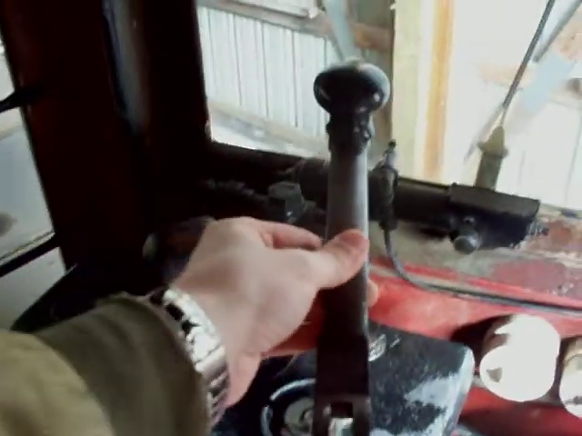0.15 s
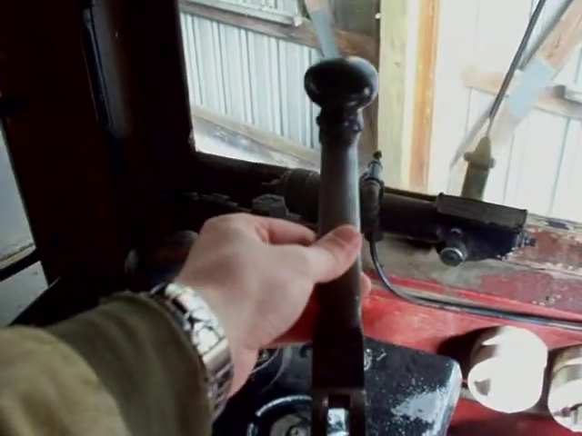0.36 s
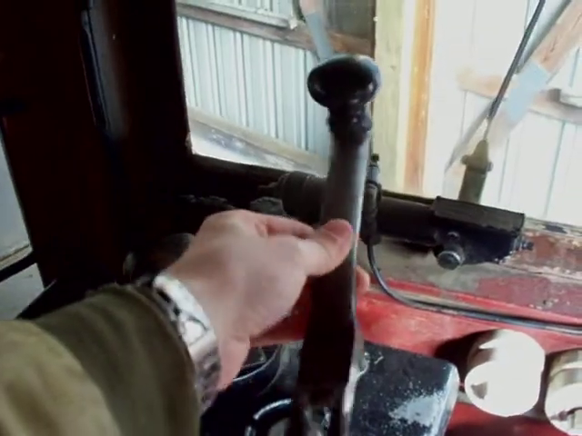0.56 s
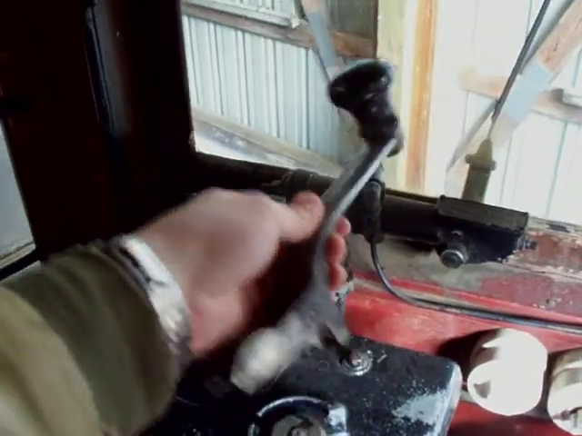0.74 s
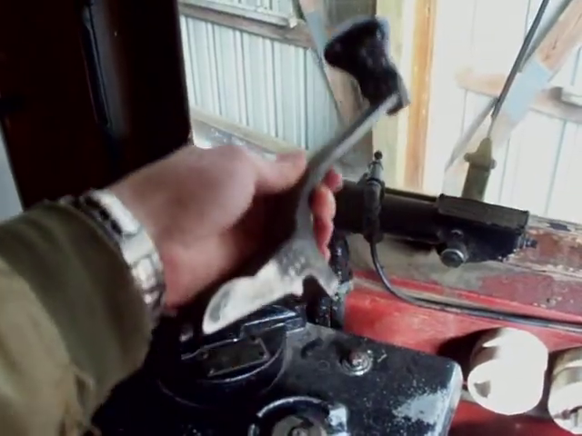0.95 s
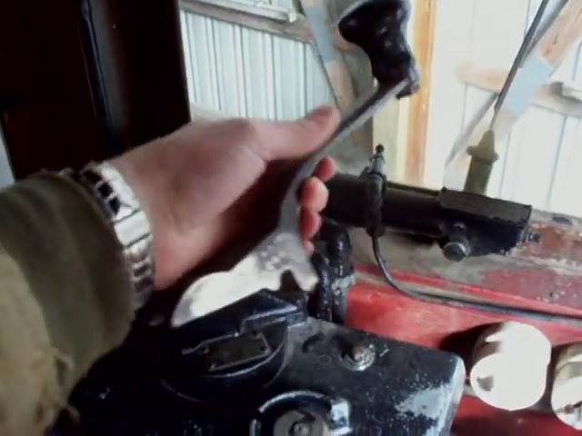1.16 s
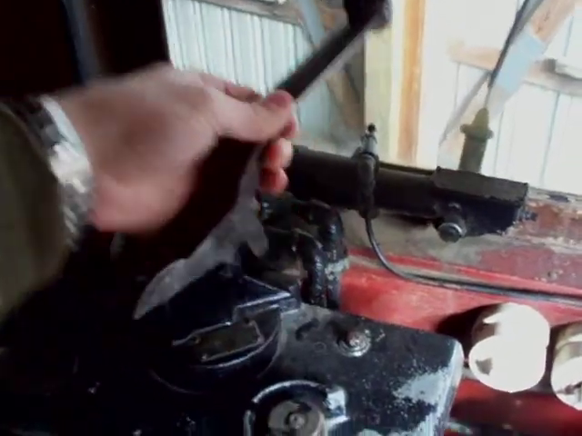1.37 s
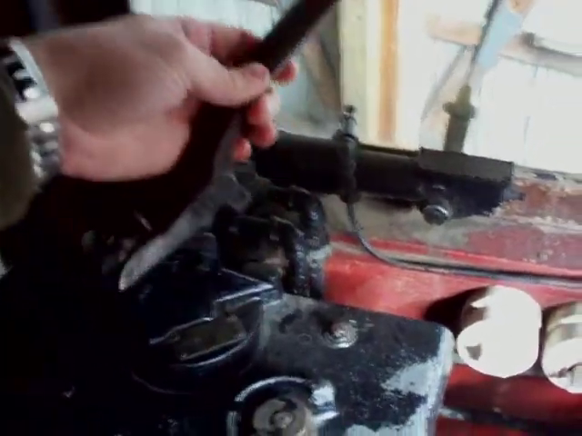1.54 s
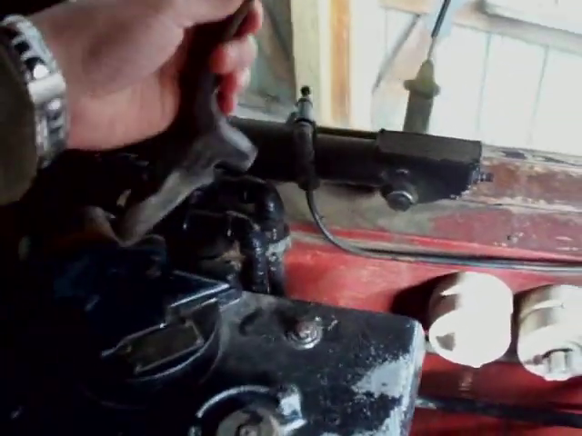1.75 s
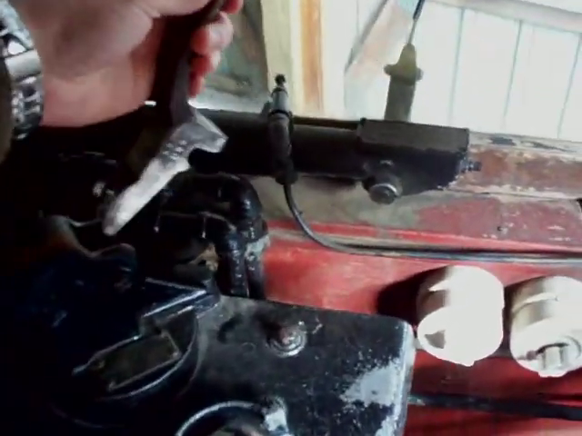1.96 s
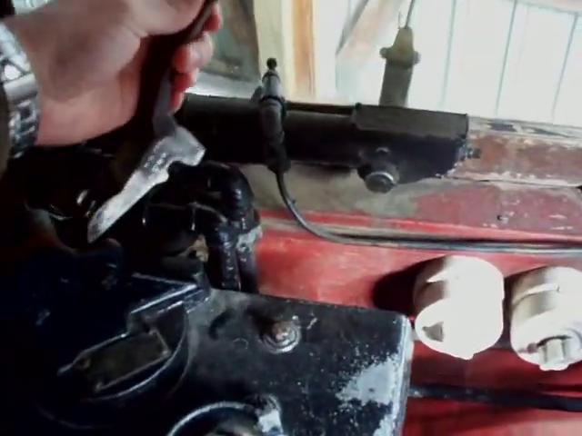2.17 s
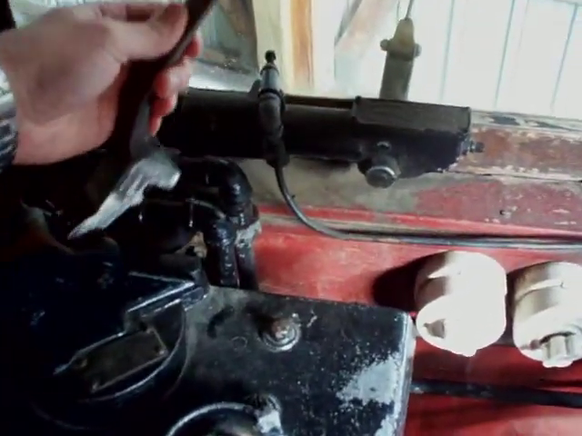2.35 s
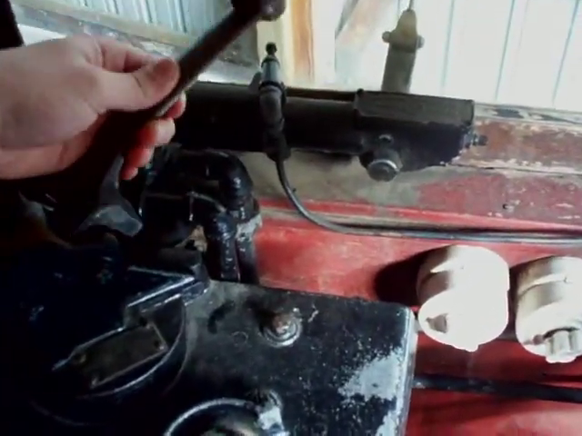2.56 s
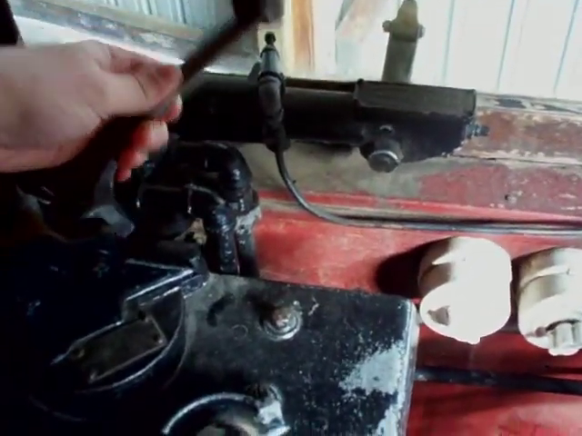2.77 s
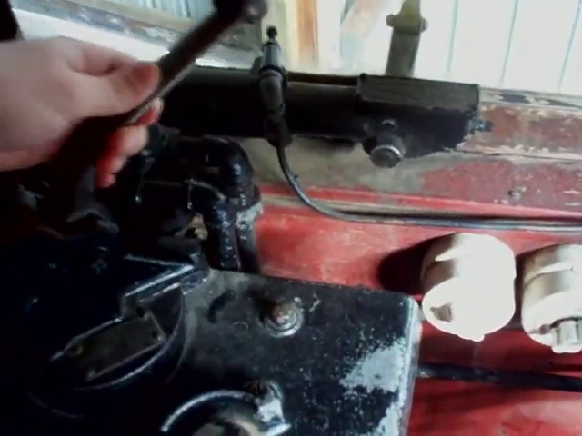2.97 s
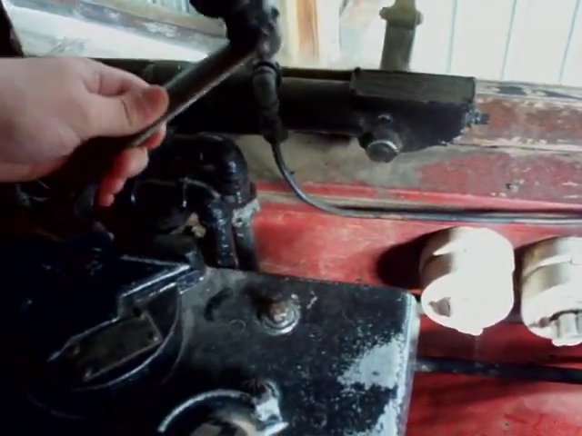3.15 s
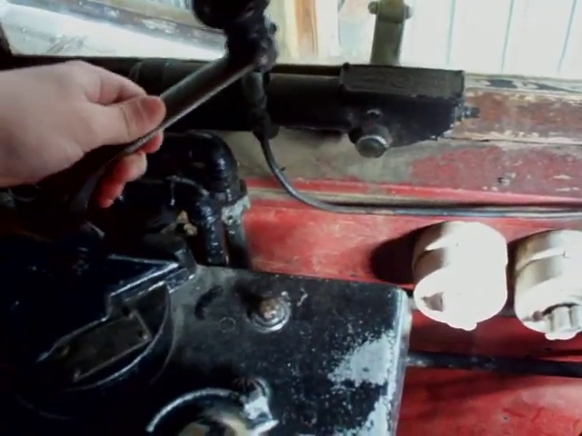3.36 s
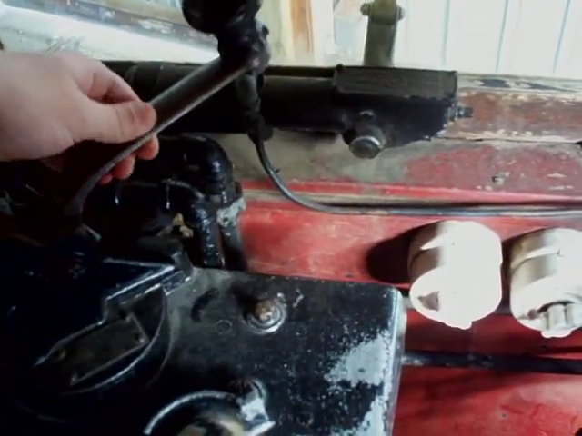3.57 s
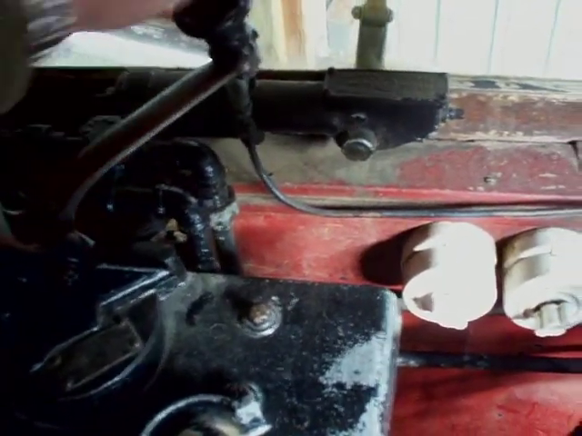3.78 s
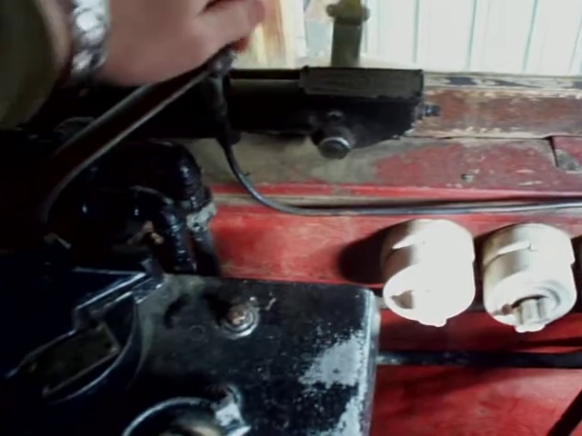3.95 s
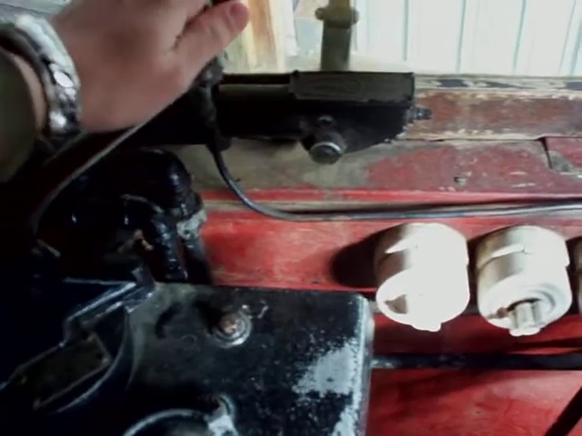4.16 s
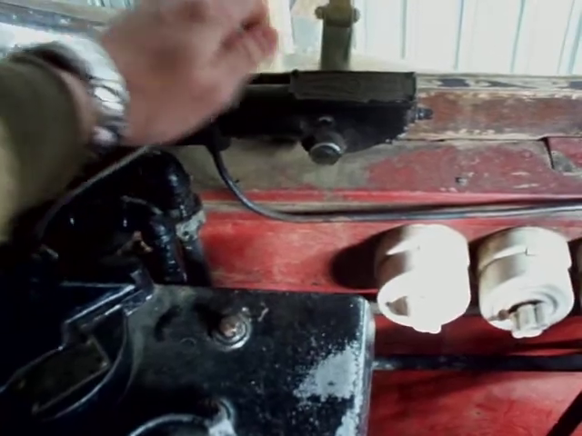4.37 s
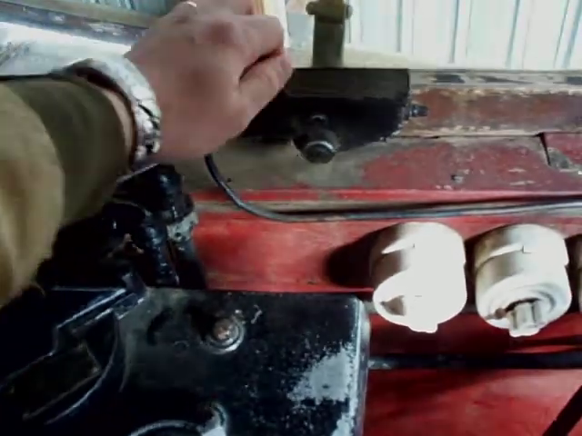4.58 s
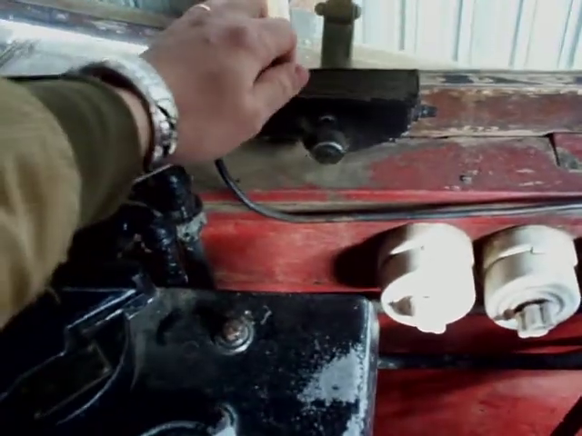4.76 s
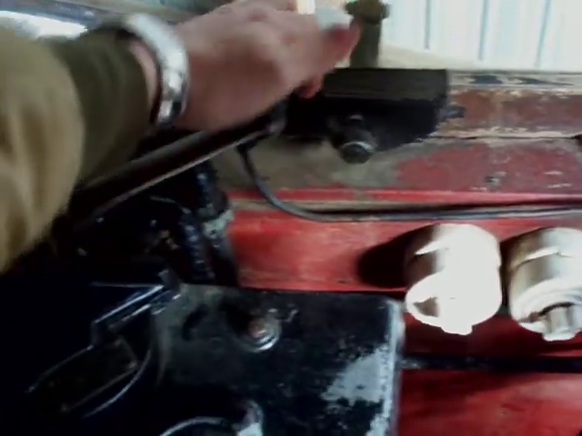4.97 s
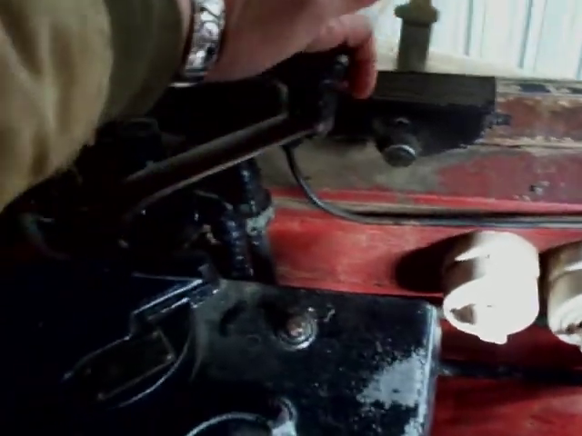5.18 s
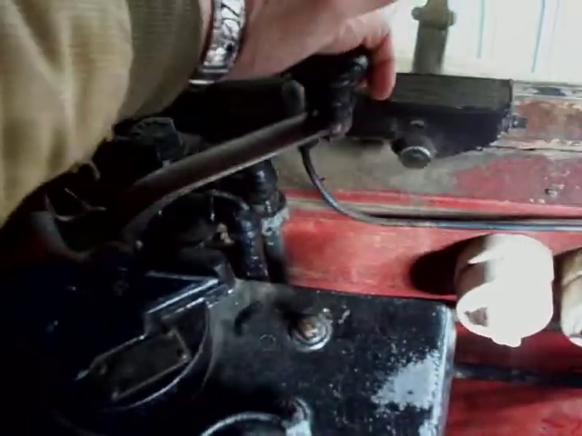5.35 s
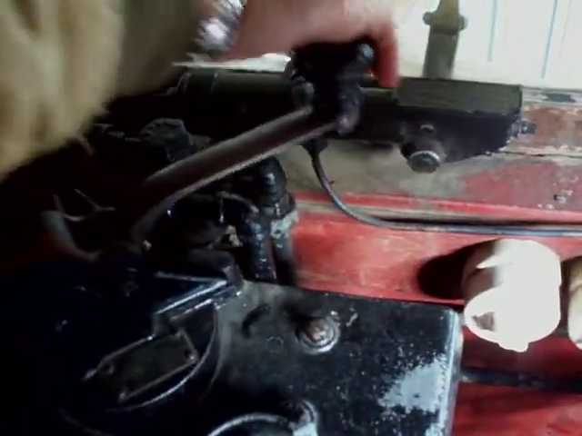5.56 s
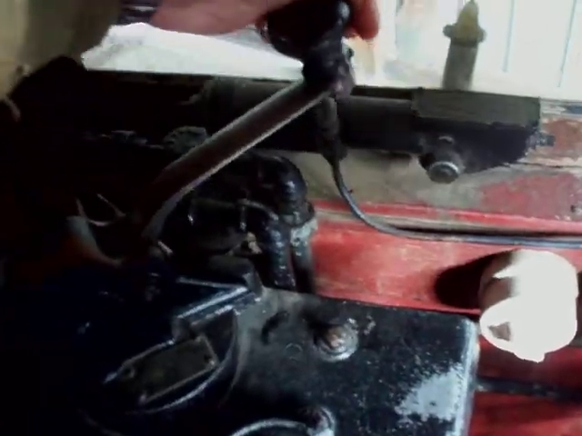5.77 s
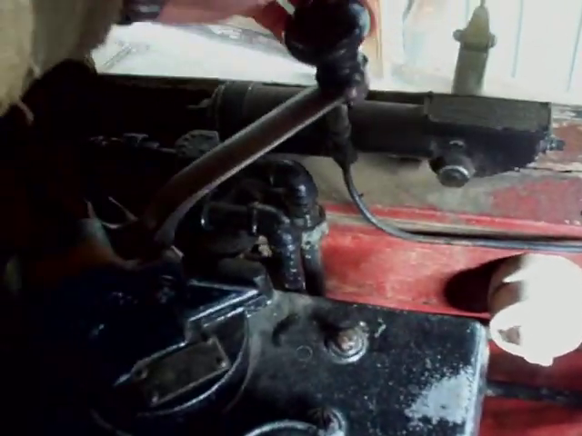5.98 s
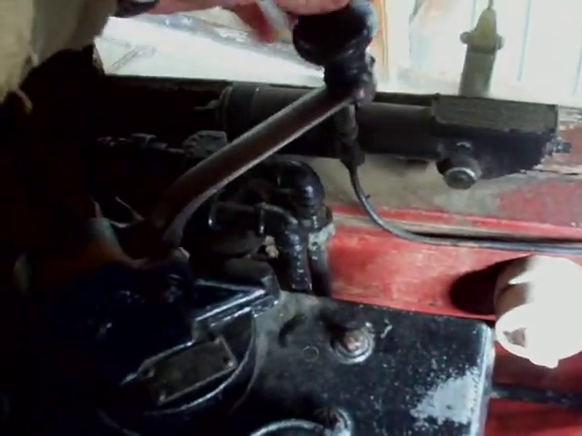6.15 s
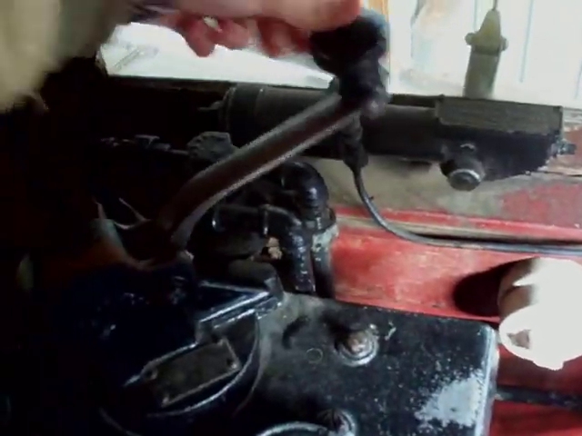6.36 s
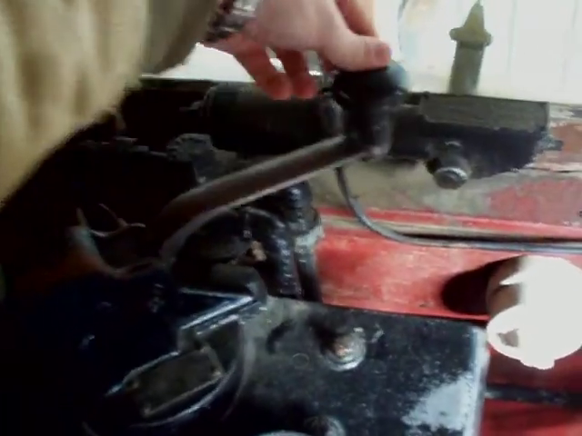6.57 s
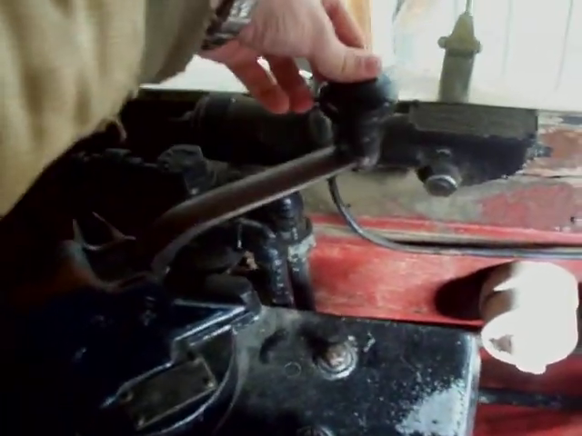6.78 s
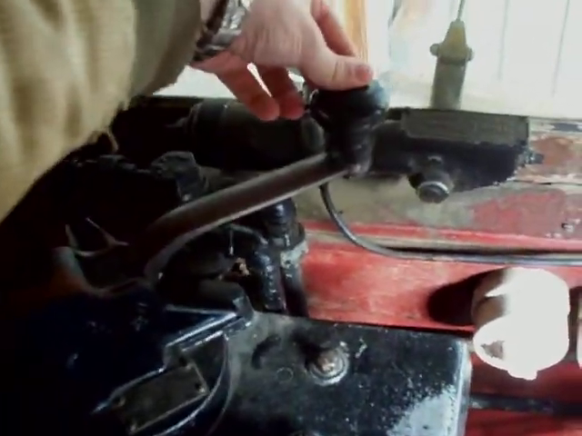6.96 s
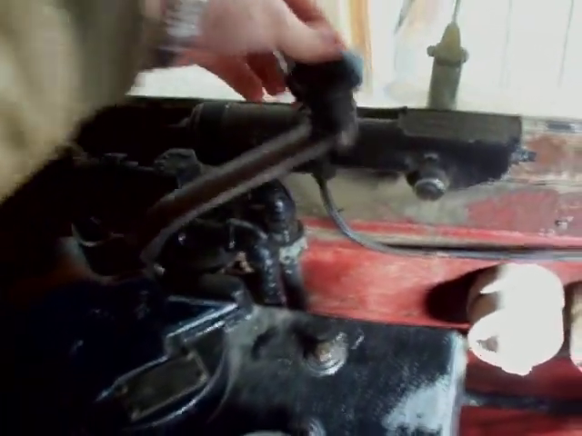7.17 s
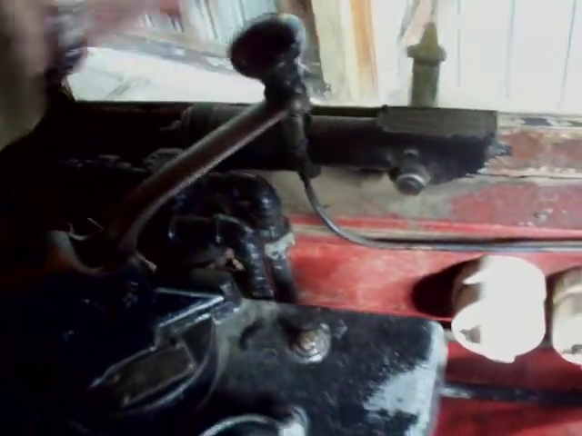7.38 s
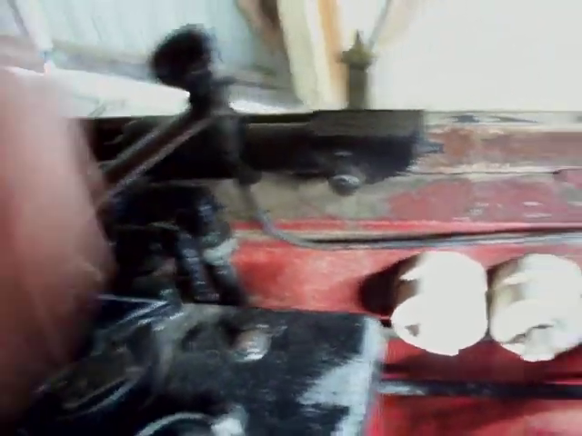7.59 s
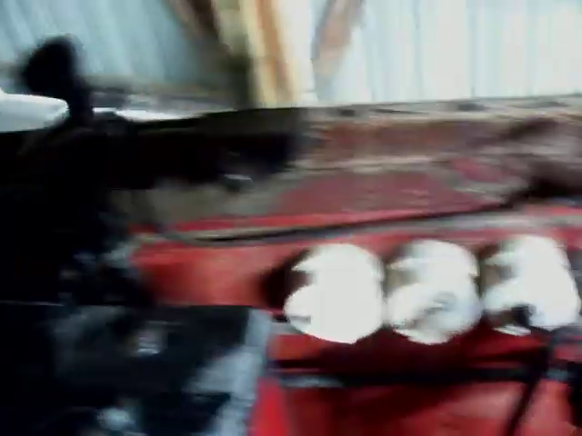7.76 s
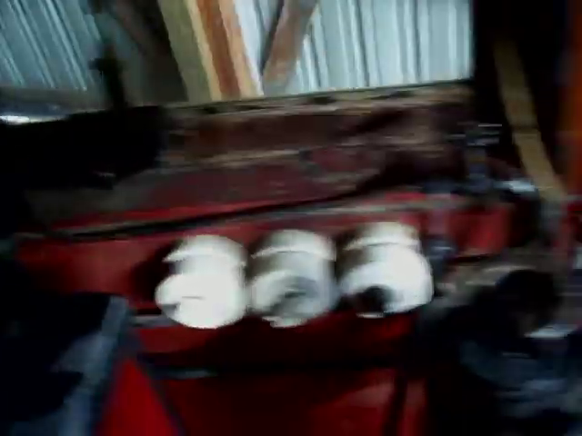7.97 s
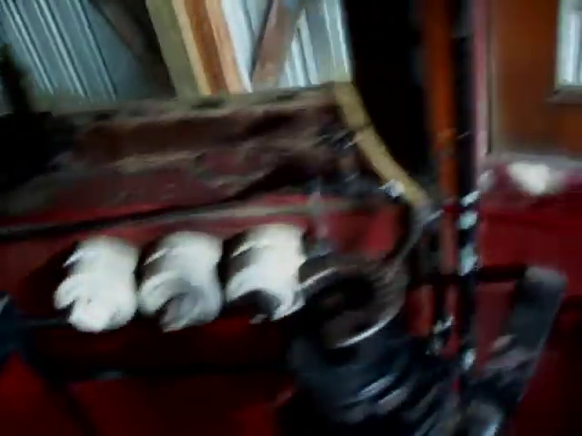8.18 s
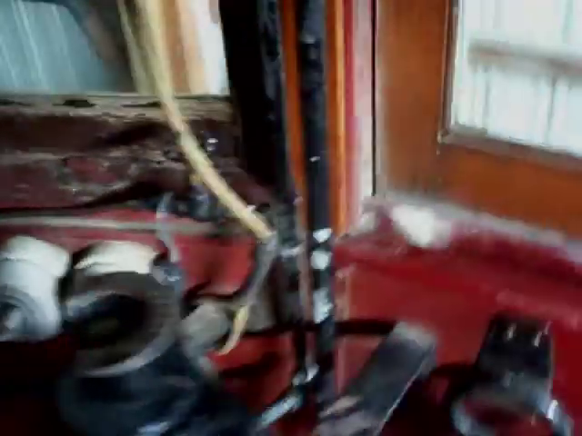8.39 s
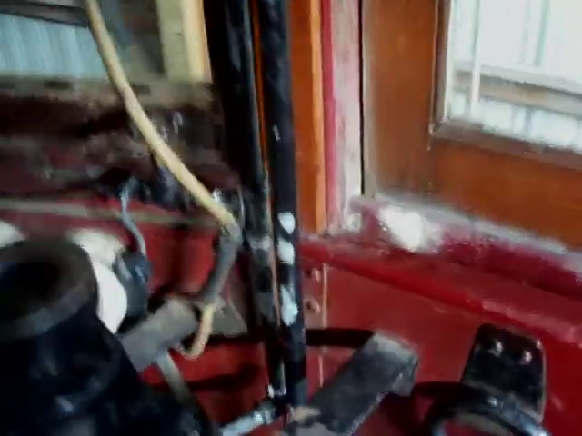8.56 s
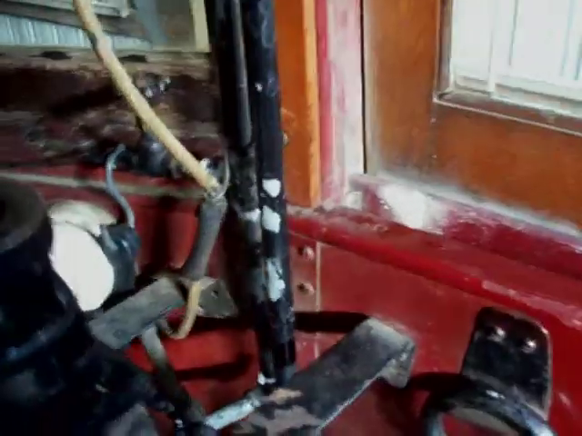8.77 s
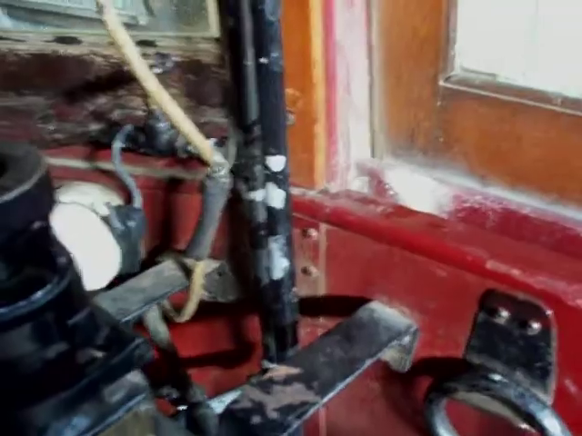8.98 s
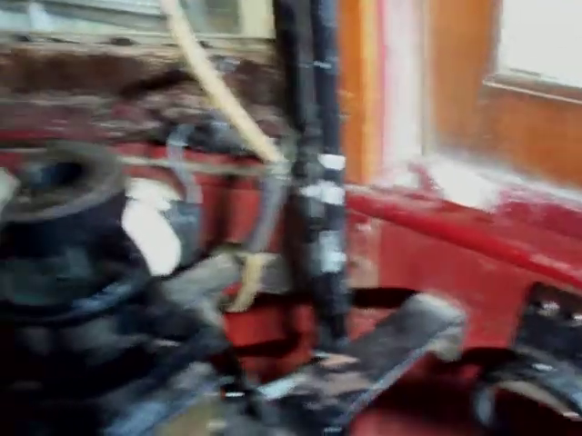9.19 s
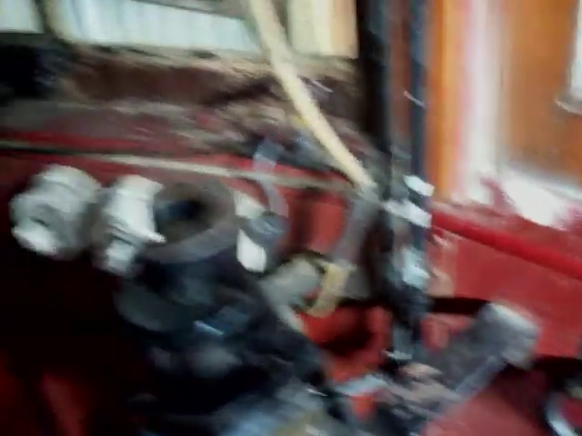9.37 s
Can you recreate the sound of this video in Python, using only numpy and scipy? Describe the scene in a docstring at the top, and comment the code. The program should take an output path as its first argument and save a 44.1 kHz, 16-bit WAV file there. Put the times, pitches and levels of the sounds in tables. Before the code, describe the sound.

A close, slightly dull microphone in a small wooden cab picks up steady soft hiss and low rumble. Only a faint bump and tiny ticks occur until about 2.1 s, when a steel handle clinks on a shaft, slides with a brief bright scrape and chatters loudly at 2.4 s. Its ring is choked as it seats; another slide leads to a hard knock at 2.75, then smaller rattling knocks until 3.3. A soft hand rub and dull bumps come near 3.9. At 4.4 a short grind and rapid contact clicks end in a heavy boomy clunk. A pawl snaps at 5.55 before a backward clunk at 5.65; forward again at 6.4, back at 7.1-7.2. Panels throb and the cab echoes briefly. Light ticks follow around 7.5-7.9. At 8.5 feet scuff and bump, then a loose iron fitting clanks strongly at 8.75, with weaker rebounds, fading into hiss and rumble.

```python
"""Steel handle fitted onto a streetcar's drum controller, cranked forward, back, forward, back through notches.
First it slides on the shaft and rings free (cracks of noise plus decaying modes), then, gripped, knocks in its play.
Each turn grinds (rubbed noise); contact fingers catch forward, a pawl snaps back; the drum drops in its notch and
panels boom. Last, feet bump and scuff and a loose iron fitting clanks. The wooden cab echoes by convolution;
microphone hiss and low rumble (shaped noise) run throughout; the output saturates softly and is dull."""
import sys
import numpy as np
from scipy import signal
from scipy.fft import rfft, irfft, next_fast_len
from scipy.io import wavfile

SR = 44100
rng = np.random.default_rng(int(sys.argv[2]) if len(sys.argv) > 2 else 0)


def transcribe(signal):
    """Save signal, clipped to [-1, 1], as a 16-bit WAV file at the path in sys.argv[1]."""
    frames = np.atleast_2d(signal).T
    limited = np.clip(frames, -1, 1)
    pcm = np.round(limited * 32767).astype(np.int16)
    wavfile.write(sys.argv[1], SR, pcm)


N = 415863

# Levels of blows and ticks are relative; each source adds its own offset.
# Microphone hiss: f/Hz, relative density/dB per Hz
HISS_SPECTRUM = [(12, -30), (20, 5.5), (22, -1.5), (150, -21.5), (381, -20), (432, -22), (542, -23),
                 (852, -26), (1180, -29.5), (1310, -29), (5360, -34), (6890, -34), (8220, -50.5),
                 (10700, -86.5), (18100, -120)]
# Hiss over time: t/s, level/dB
HISS_LEVEL = [(0, -54.5), (.6, -58.5), (1.1, -57.5), (1.5, -52.5), (2.1, -57), (6.9, -57), (7.5, -50),
              (8.6, -51), (9.4, -48.5)]
# Car-body rumble at rest, and the shake added by a heavy blow
RUMBLE_DB = -58.5
SHAKE_DB = {"forward": -40, "back": -41.5, "down": -39, "clank": -46}
SHAKE_RISE_S, SHAKE_T60_S = .08, 2.3

# Cab echo, strength: f/Hz, level/dB
CAB_DB = [(40, 4.5), (120, 1.5), (250, -7.5), (600, -8), (1500, -11), (4000, -12), (8000, -16)]
# Cab echo, decay: f/Hz, t60/s
CAB_T60 = [(40, 1.8), (120, 1.5), (250, 1.1), (600, 0.55), (1500, 0.47), (4000, 0.37), (8000, 0.53)]
# Panels of case and floor, by direction of blow: f/Hz, level/dB, rise/s, t60/s
PANEL_BOOMS = {"forward": [(98, -29, 0.029, 0.4), (123.5, -28, .067, .44), (219, -20, 0.012, 0.14),
               (637, -36.5, .005, 0.38)], "back": [(93, -35, 0.082, 0.58), (230, -30, 0.012, 0.21),
               (286, -23, 0.0045, 0.22), (640, -25.5, 0.003, 0.14), (830, -35.5, .005, 0.3)],
               "down": [(76, -44, .09, .53), (304, -22.5, 0.0085, 0.22)]}
# Handle driven down onto the shaft: t/s, boom level/dB
SEATINGS = [(2.422, 1.5), (2.752, -4)]

# Steel sliding on steel as the handle seeks the shaft: start/s, length/s, level at end/dB
SLIDES = [(2.23, .17, -54), (2.52, .15, -55.5)]
# Dull rubbing, hand on knob, later a foot: start/s, length/s, level at end/dB
SCUFFS = [(3.87, 0.16, -56), (8.515, 0.35, -41.5)]
GRIND_DB, PRESS_DB_PER_S, RUB_FADE_S = -43.5, 30.5, .025

# Light ticks, mostly of hand and watch strap, one a sharp broad click at 4.56 s: t/s, level/dB, centre f/Hz
TICKS = [(1.936, -42, 3300), (1.949, -47, 5500), (2.207, -27, 4097), (4.564, -32.5, 2400),
         (5.909, -45.5, 2170), (6.037, -42.5, 2000), (7.04, -38.5, 3740), (7.062, -40, 3770),
         (7.48, -30, 6100), (7.485, -23.5, 6230), (7.497, -29.5, 6100), (7.708, -42, 3700),
         (7.774, -25, 4200), (7.926, -39, 2050), (8.597, -39, 3400)]
# Fainter ticks at random times
FAINT_PER_S, FAINT_DB, FAINT_HZ = .8, -49, (2000, 6000)

# Dull bumps of drum, hand and feet: t/s, level/dB, extra bass/dB
BUMPS = [(1.305, -25, -18), (2.325, -20.5, 6), (2.624, -12, -4), (3.942, -29.5, 9), (4.053, -27.5, -11.5),
         (5.359, -21, -6.5), (5.475, -20.5, -1), (6.179, -19.5, -11), (7.05, -19.5, -10), (8.517, -24, 5.5),
         (8.6, -17, -6), (8.675, -19, 3.5)]
# Loose iron fitting: t/s, level/dB, extra bass/dB, extra treble/dB, extra ring/dB
CLANKS = [(8.764, -2.7, -4.5, -0.5, 2.5), (8.842, -15.5, -9, -10, 13.5), (8.854, -12, 5.5, -7, 9)]
# Free handle on shaft: t/s, level/dB, extra bass/dB, extra treble/dB, extra ring/dB
CLINKS = [(2.127, 1.5, -4, -4.5, -3), (2.207, -11.5, 4.5, -3.5, -2), (2.409, 6.5, -8, 1, -8),
          (2.413, 8, -5.5, -2.5, 6.5), (2.419, 5, 3.5, -2, -9), (2.448, 3.5, -2, 2.5, 0.5),
          (2.473, 4, -6, 1.5, .5), (2.486, 3, 7.5, -3, -15)]
# Seated handle in its play: t/s, level/dB, extra bass/dB, extra treble/dB, extra ring/dB
KNOCKS = [(2.671, -5.5, -1, -8, 2.5), (2.7465, 11, 1, 3, .5), (2.79, 6.5, -6.5, -9, 0),
          (2.803, 5, 0, -3, -2.5), (2.943, -5.5, -7.5, -16, -2.5), (3.014, -8.5, -2, 4, -12),
          (3.03, 6.5, -0.5, -10.5, -13.5), (3.042, 1, 6.5, 3.5, -1), (3.083, -8, -2, -4, -10),
          (3.288, 1, 0.5, -6, -1), (3.813, -18, 3, 7.5, -2.5)]
# Pawl over a tooth on the way back: t/s, level/dB, extra bass/dB, extra treble/dB
PAWL_SNAPS = [(5.545, -1.5, 3.5, -2.5), (7.0895, 0.5, -1, 1.5)]
# Drum into notch: t/s, direction, level/dB, extra treble/dB, boom level/dB, boom pitch factor, drag start/s
NOTCHES = [(4.4203, "forward", 6, 1, -1, 0.9, 4.335), (5.66, "back", 3.5, -7.5, 1.4, 0.9, 5.34),
           (6.401, "forward", 6, .5, 1.5, 1.06, 6.338), (7.191, "back", 4, -2, 0.6, 0.986, 7.04)]

# Crack spectrum, fitting: f/Hz, relative density/dB per Hz
CLANK_COLOUR = [(35, -45), (60, -27), (118, -5), (190, -14), (243, -2), (602, -9), (1050, -10), (1320, -21),
                (2160, -24.5), (2820, -16), (3060, -25), (6830, -30), (8220, -39), (10700, -90),
                (18100, -120)]
# Crack spectrum, dull bumps: f/Hz, relative density/dB per Hz
BUMP_COLOUR = [(35, -40.5), (60, -7.5), (109, 2), (151, -2.5), (389, -0.5), (667, -5.5), (793, -14),
               (1170, -20), (1820, -30), (6000, -38), (7800, -59.5), (13200, -120)]
# Crack spectrum, free handle: f/Hz, relative density/dB per Hz
CLINK_COLOUR = [(35, -38), (60, -11.5), (219, -5), (293, -4.5), (1160, -12.5), (2110, -11), (3390, -23.5),
                (3760, -6), (4720, -20.5), (6970, -16), (8220, -50.5), (10700, -82.5), (18100, -120)]
# Crack spectrum, seated handle: f/Hz, relative density/dB per Hz
KNOCK_COLOUR = [(35, -47), (60, -9), (145, -13.5), (287, 0.5), (407, -13.5), (640, -3), (1210, -16.5),
                (1620, -9), (1760, -16), (2110, -15.5), (2600, -25.5), (3920, -11), (4620, -24.5),
                (6550, -13), (8220, -48), (10700, -72), (18100, -120)]
# Crack spectrum, contact fingers: f/Hz, relative density/dB per Hz
FINGER_COLOUR = [(88, -33.5), (150, -19), (701, -8), (842, 5), (1050, -29.5), (1490, -7), (1820, -24),
                 (2120, -15), (2460, -18.5), (5230, -15.5), (8220, -22), (10700, -70), (18100, -120)]
# Crack spectrum, pawl: f/Hz, relative density/dB per Hz
PAWL_COLOUR = [(88, -33), (150, -18), (308, 3.5), (485, -23), (613, -1.5), (1160, -12.5), (1510, -3.5),
               (1980, -16), (2810, -4), (3060, -16), (4890, -2), (5320, -6), (8220, -25.5), (10700, -66),
               (18100, -120)]
# Crack spectrum, drum in notch: f/Hz, relative density/dB per Hz
NOTCH_COLOUR = [(24, -41), (45, -13.5), (110, -5), (240, -6), (400, -11.5), (520, -19), (630, -4.5),
                (820, -16), (1030, -16.5), (2200, -15.5), (2650, -22.5), (4000, -12), (4800, -25.5),
                (5500, -22.5), (7190, -27), (8220, -58)]

# Modes of the loose fitting: f/Hz, relative level/dB, t60/s
FITTING_MODES = [(871, 5, 0.12), (967, 0, 0.12), (1020, 0, 0.15), (1090, -4.5, 0.21), (1489, -7.5, 0.17),
                 (2820, -15.5, .55), (3385, -21, 1)]
# Modes of the drum body: f/Hz, relative level/dB, t60/s
DRUM_MODES = [(231, -1, 0.39), (300, -2, 0.3), (620, -3, .1), (726, -2, 0.1), (814, -5, .09),
              (1120, -7, .07), (2070, -12.5, .05)]
# Modes of the free handle: f/Hz, relative level/dB, t60/s
FREE_HANDLE_MODES = [(624, -6, .18), (1066, -12, .15), (1290, -11, .15), (1712, -10, .14), (2163, 0, .12),
                     (2430, -8, .15), (3650, -9, .2), (3693, -3, .23), (3919, -14, .3), (5028, -10, .24),
                     (5480, -8, .34), (5588, -7, .25), (6881, -10, .2), (6917, -3.5, .4), (7714, -20, .08),
                     (8242, -24, .08)]
# Modes of the seated handle: f/Hz, relative level/dB, t60/s
SEATED_HANDLE_MODES = [(299.5, -6, 0.27), (628, -5, 0.15), (762, -3.5, .09), (1644, -6, 0.067),
                       (2140, 3, 0.047), (2400, -10.5, 0.091), (3880, -1.5, 0.053), (4250, 2.5, 0.034),
                       (5200, -4.5, 0.022), (5290, -6, 0.048), (6400, -6.5, 0.023)]
# Modes of the pawl: f/Hz, relative level/dB, t60/s
PAWL_MODES = [(2734, -3, 0.025), (2794, -5, 0.074), (5270, -2.5, 0.022), (5390, 2, .04)]
# Modes of the controller case: f/Hz, relative level/dB, t60/s
CASE_MODES = [(164.6, -10.5, 0.25), (227.7, -2, 0.47), (293, -5.5, 0.46), (364, -16, 0.86),
              (479, -16.5, 0.36), (619.5, -1, 0.13), (716, -19, 0.088), (1052, -6.5, 0.17),
              (1310, -12, 0.11), (1720, -18, 0.091), (2180, -17.5, 0.06), (4010, -13, 0.092),
              (5770, -19, 0.086)]

SEATED_S = 2.487  # shaft grips the handle and stops its ring
FINGER_DB, FINGER_STEP_DB, FINGER_SPACING = -14, -.9, .18  # spacing as a share of the drag
EDGE_HZ = 8400
BANDS_HZ = np.geomspace(35, 9000, 25)


def amp(db):
    """Decibels to amplitude factor."""
    return 10 ** (np.asarray(db) / 20)


def evened(x):
    """Scales to rms 1."""
    return x / np.sqrt(np.mean(x ** 2, axis=-1, keepdims=True) + 1e-20)


def read(points, hz):
    """Interpolates a table on a log-frequency axis."""
    f, value = np.transpose(points)
    return np.interp(np.log(hz + 1), np.log(f + 1), value)


def add(mix, s, sound):
    """Adds a sound in place, s seconds into the mix."""
    part = mix[max(round(s * SR), 0):][:len(sound)]
    part += sound[:len(part)]


def noise(spectrum, size):
    """Noise of rms 1 with the given spectrum."""
    hz = np.fft.rfftfreq(size, 1 / SR)
    return evened(irfft(rfft(rng.standard_normal(size)) * amp(read(spectrum, hz)), size))


def banded(x):
    """Splits a signal below 9 kHz into third-octave bands whose powers add up."""
    hz = np.fft.rfftfreq(len(x), 1 / SR)
    index = np.arange(len(BANDS_HZ))
    place = np.interp(hz, BANDS_HZ, index)
    share = np.maximum(1 - abs(place - index[:, None]), 0)
    share[-1, hz > BANDS_HZ[-1]] = 0
    return irfft(rfft(x) * np.sqrt(share), len(x))


def heavy_blows():
    """Blows that shake the cab: t/s, direction, boom level/dB, pitch factor."""
    seatings = [(s, "down", db, 1) for s, db in SEATINGS]
    return seatings + [(s, way, db, pitch) for s, way, _, _, db, pitch, _ in NOTCHES]


def hiss():
    """Microphone noise whose level drifts."""
    level_db = np.interp(np.arange(N) / SR, *np.transpose(HISS_LEVEL))
    return noise(HISS_SPECTRUM, size=next_fast_len(N))[:N] * amp(level_db)


def rumble():
    """Low car-body noise whose power wells up after each heavy blow and the first clank."""
    t = np.arange(N) / SR
    spectrum = [(5, -7.5), (28, 3.0), (50, -12), (200, -21.5), (500, -32.5), (2000, -58)]
    shake = (1 - np.exp(-t / SHAKE_RISE_S)) * amp(-60 * t / SHAKE_T60_S)
    power = np.full(N, amp(RUMBLE_DB) ** 2)
    for s, way, *_ in heavy_blows():
        add(power, s, (amp(SHAKE_DB[way]) * shake) ** 2)
    add(power, CLANKS[0][0], (amp(SHAKE_DB["clank"]) * shake) ** 2)
    return noise(spectrum, size=next_fast_len(N))[:N] * np.sqrt(power)


def cab(x, scatter_hz=70):
    """Dense reflections off wood and glass; bass hangs on longest, treble scatters over many paths."""
    t = np.arange(SR * 3 // 2) / SR
    decay = amp(-60 * t / read(CAB_T60, BANDS_HZ)[:, None]) * (1 - np.exp(-(t / 0.0053) ** 2))
    low = signal.sosfiltfilt(signal.butter(2, 900, fs=SR, output="sos"), x)
    treble = x - low
    turn = 2 * np.pi * scatter_hz * np.arange(N) / SR
    out = np.zeros(N)
    # treble turns between two echo paths, which blurs its tones into a hiss
    for feed in (low + treble * np.cos(turn), treble * np.sin(turn)):
        bands = banded(rng.standard_normal(len(t)))
        weight = amp(read(CAB_DB, BANDS_HZ)) * bands.std(1)
        response = weight @ evened(bands * decay) / np.sqrt(len(t))
        out += signal.oaconvolve(feed, response)[:N]
    return out


def booms():
    """Clusters of panel modes, as narrow noise, take up each heavy blow and throb it away."""
    out, t = np.zeros(N), np.arange(SR) / SR
    for s, way, blow_db, pitch in heavy_blows():
        for panel_hz, db, rise_s, t60_s in PANEL_BOOMS[way]:
            hz = panel_hz * pitch
            swell = (1 - np.exp(-t / rise_s)) ** 2 * amp(-60 * t / t60_s)
            cluster = [(hz / 2, -30), (hz / 0.97, -3), (hz, 0), (hz * 1.2, -4), (hz * 2, -35), (hz * 4, -90)]
            throb = evened(swell * noise(cluster, size=len(t)))
            rms_to_peak = np.sqrt(np.mean(swell ** 2)) / swell.max()
            add(out, s, amp(blow_db + db) * throb * rms_to_peak)
    return out


def rub(strokes, colour):
    """Friction noise that grows with hand pressure through each stroke, with brief fades."""
    out = np.zeros(N)
    for s, length_s, db in strokes:
        t = np.arange(0, length_s + RUB_FADE_S, 1 / SR)
        fade = np.clip(np.minimum(t, t[-1] - t) / RUB_FADE_S, 0, 1)
        pressure = amp(db + PRESS_DB_PER_S * (t - length_s))
        add(out, s, noise(colour, size=SR)[:len(t)] * fade * pressure)
    return out


def slides():
    """Steel on steel: bright friction as the handle sinks onto the shaft."""
    return rub(SLIDES, [(500, -14.0), (3000, -15.5), (4200, 1), (6500, -4.0), (8000, -19.5)])


def grind():
    """Low friction: the drum in its bearings until it drops, plus the dull scuffs."""
    drags = [(start, s - start, GRIND_DB) for s, *_, start in NOTCHES]
    return rub(SCUFFS + drags, [(30, -15.0), (120, 2.5), (300, 8), (480, -14), (750, -9.5),
                                (1300, -15.0), (3000, -29), (8000, -38.0)])


def ticks(level_db, t60_s):
    """Ticks: a few milliseconds of noise around one pitch, listed and random."""
    out, t = np.zeros(N), np.arange(2048) / SR
    faint = [(when * N / SR, FAINT_DB, np.interp(pitch, [0, 1], FAINT_HZ))
             for when, pitch, chance in rng.random((40, 3)) if chance < FAINT_PER_S * N / SR / 40]
    for s, db, hz in TICKS + faint:
        spectrum = [(hz / 8, -50), (hz / 2, -22), (hz / 1.5, -5), (hz, 0),
                    (hz * 1.15, -4), (hz * 1.4, -17), (hz * 3, -34)]
        envelope = amp(db + level_db - 60 * t / t60_s) * (1 - np.exp(-t * hz / 2))
        add(out, s, envelope * noise(spectrum, size=len(t)))
    return out


def tilt(hz, bass_db, treble_db):
    """How one blow favours the low or the high end."""
    return amp(read([(300, bass_db), (750, 0), (2400, 0), (4500, treble_db)], hz))


def crack(colour, bass_db, treble_db, t60_s, linger, patchy_db, patch_hz=260):
    """Countless brief modes of a struck casting as banded noise; low ones build up and die more slowly."""
    t, hz = np.arange(8192) / SR, BANDS_HZ[:, None]
    # each point of impact favours its own clusters of modes
    bins_hz = np.fft.rfftfreq(len(t), 1 / SR)
    patches = np.interp(bins_hz / patch_hz, np.arange(128), rng.standard_normal(128))
    bands = banded(irfft(rfft(rng.standard_normal(len(t))) * amp(patchy_db * patches)))
    life_s = np.clip(t60_s, .005, .5) * np.maximum(2500 / hz, .6) ** linger  # t60_s holds at 2500 Hz
    build_up = 1 - np.exp(-t / (0.00012 + 1.7 / hz))
    bands = evened(bands * np.exp(-np.log(1000) * t / life_s) * build_up)
    weight = amp(read(colour, BANDS_HZ)) * np.sqrt(BANDS_HZ)
    # energy 1 in the middle band
    weight = weight / np.linalg.norm(weight[(BANDS_HZ > 600) & (BANDS_HZ < 3000)])
    return (weight * tilt(BANDS_HZ, bass_db, treble_db)) @ bands / np.sqrt(len(t))


def ring(modes, bass_db, treble_db):
    """The few long-lived modes as decaying sines, struck together."""
    t = np.arange(SR * 3 // 5) / SR
    hz, db, t60_s = np.transpose(modes)[:, :, None]
    envelope = amp(db - 60 * t / t60_s) * (1 - np.exp(-t * hz / .7))
    swing = envelope * np.sin(2 * np.pi * (hz * t + rng.random(hz.shape)))
    return (swing * tilt(hz, bass_db, treble_db)).sum(0) / np.linalg.norm(swing)  # energy 1 before tilt


def blows(rows, colour, modes, t60_s, crack_db, ring_db, linger, patchy_db=5.0, freedom=1):
    """Each blow: a crack, plus the ring of the struck part as far as it is free to ring."""
    cracks, rings = np.zeros((2, N))
    for row in rows:
        s, db, bass_db, treble_db, modes_db = np.pad(row, (0, 5 - len(row)))  # missing columns are 0
        add(cracks, s, amp(db + crack_db) * crack(colour, bass_db, treble_db, t60_s, linger, patchy_db))
        add(rings, s, amp(db + ring_db + modes_db) * ring(modes, bass_db, treble_db))
    return cracks + rings * freedom


def bumps():
    """Soft blows of drum, hand and feet: dull cracks over drum-body modes."""
    return blows(BUMPS, BUMP_COLOUR, DRUM_MODES, t60_s=.08, crack_db=-4.0, ring_db=3.2, linger=1.0)


def clanks():
    """Loose iron fitting, struck and left to ring."""
    return blows(CLANKS, CLANK_COLOUR, FITTING_MODES, t60_s=0.13, crack_db=-4, ring_db=-2.5, linger=0.53)


def clinks():
    """Free handle chattering on the shaft; its ring drops 17 dB once gripped."""
    freedom = amp(np.interp(np.arange(N) / SR, [SEATED_S, SEATED_S + .008], [0, -17]))
    return blows(CLINKS, CLINK_COLOUR, FREE_HANDLE_MODES, t60_s=0.058, crack_db=-2.5, ring_db=4.5,
                 linger=0.3, freedom=freedom)


def knocks():
    """Seated handle in its play: its gripped modes die fast."""
    return blows(KNOCKS, KNOCK_COLOUR, SEATED_HANDLE_MODES, t60_s=0.047, crack_db=-3.0, ring_db=1.5,
                 linger=0.53, patchy_db=2.0)


def fingers(count=5):
    """Contact fingers catch in turn during each forward drag, each a little weaker."""
    catches = [(start + k * FINGER_SPACING * (s - start), FINGER_DB + k * FINGER_STEP_DB)
               for s, way, *_, start in NOTCHES if way == "forward" for k in range(count)]
    return blows(catches, FINGER_COLOUR, SEATED_HANDLE_MODES, t60_s=.085, crack_db=-1.0, ring_db=-.5,
                 linger=0.34)


def pawls():
    """Pawl snapping over a tooth: a short bright crack and small high modes."""
    return blows(PAWL_SNAPS, PAWL_COLOUR, PAWL_MODES, t60_s=0.036, crack_db=-5.5, ring_db=-1,
                 linger=0.72, patchy_db=1.5)


def drops(direction):
    """Blow rows of the drum falling into its notches in one direction."""
    return [(s, db, 0, treble_db) for s, way, db, treble_db, *_ in NOTCHES if way == direction]


def notches():
    """Drum drops into its notches and strikes the case; the cracks last longer on the way back."""
    forward = blows(drops("forward"), NOTCH_COLOUR, CASE_MODES, t60_s=0.054, crack_db=-2.2, ring_db=2.0,
                    linger=0.51, patchy_db=0.3)
    back = blows(drops("back"), NOTCH_COLOUR, CASE_MODES, t60_s=0.1, crack_db=-2.5, ring_db=1.5,
                 linger=0.34, patchy_db=2.2)
    return forward + back


def scene():
    """Direct sounds, their cab echo with a send level each, and the unechoed lows and hiss."""
    small = ticks(level_db=-2.5, t60_s=0.021) + slides() + grind()
    bump, clank = bumps(), clanks()
    clink, knock = clinks(), knocks()
    mechanism = pawls() + fingers()
    notch = notches()
    direct = small + bump + clank + clink + knock + mechanism + notch
    echo = cab(amp(-7.0) * small + amp(-3.5) * bump + amp(5.5) * clank + amp(-4.0) * (clink + knock)
               + amp(-1.9) * mechanism + amp(-0.97) * notch)
    return (direct + echo + booms() + hiss() + rumble())[None]


def record(dry):
    """Soft saturation of loud blows, treble shaping, then a steep low-pass at the band edge."""
    squeezed = np.tanh(dry)
    hz = np.fft.rfftfreq(N, 1 / SR)
    dulled = irfft(rfft(squeezed) * amp(read([(7200, -0.5), (7800, -11), (8400, -7.5)], hz)), N)
    lowpass = signal.firwin(101, EDGE_HZ, window=("kaiser", 8), fs=SR)
    return signal.oaconvolve(dulled, lowpass[None], "same")


dry = scene()
out = record(dry)
transcribe(out)
```